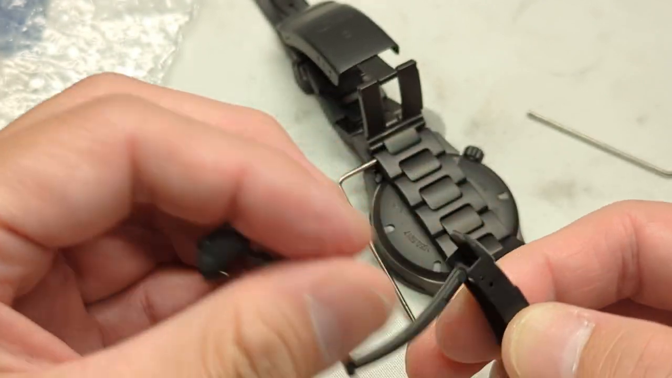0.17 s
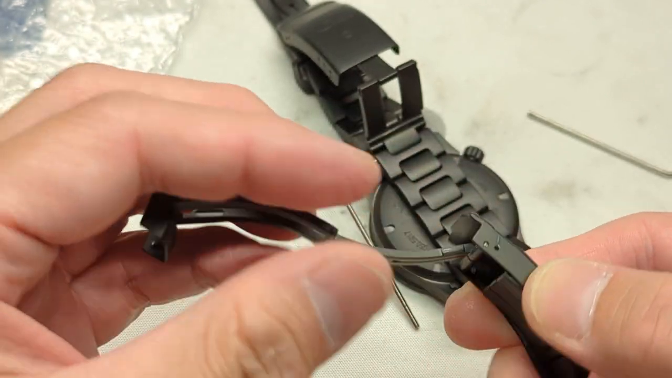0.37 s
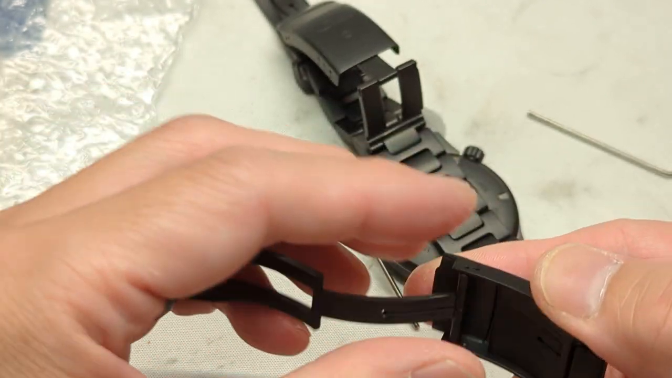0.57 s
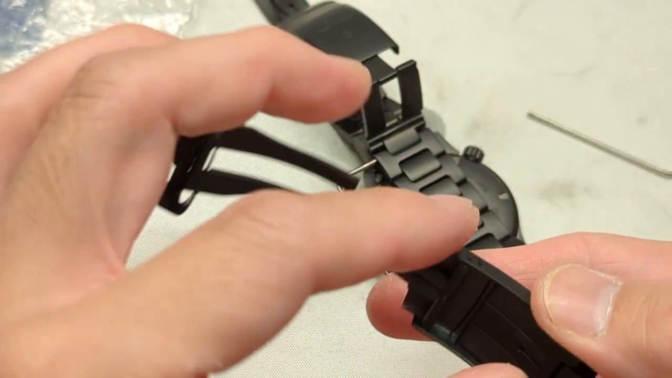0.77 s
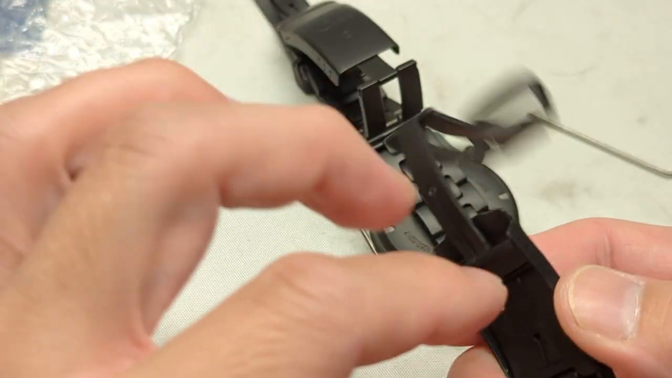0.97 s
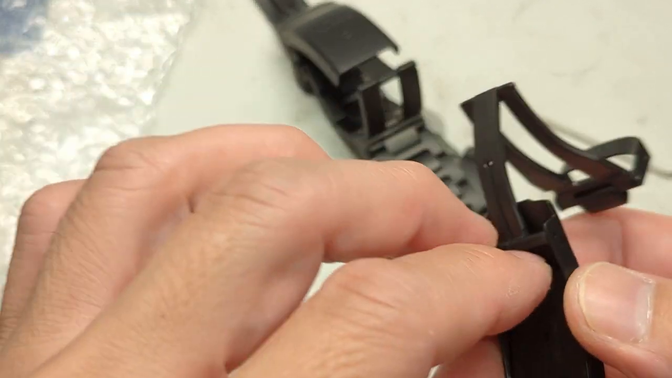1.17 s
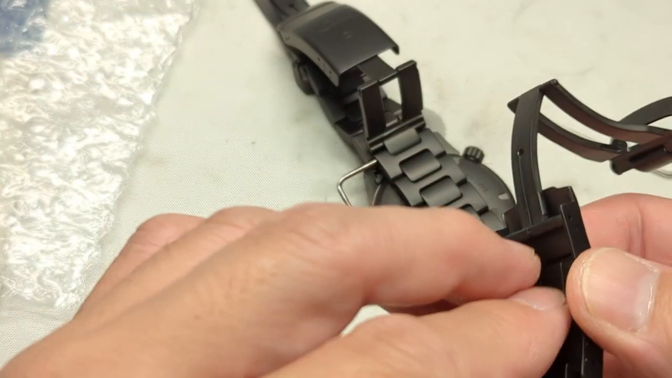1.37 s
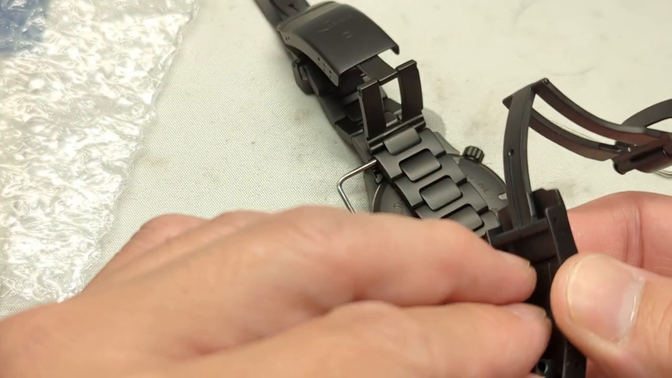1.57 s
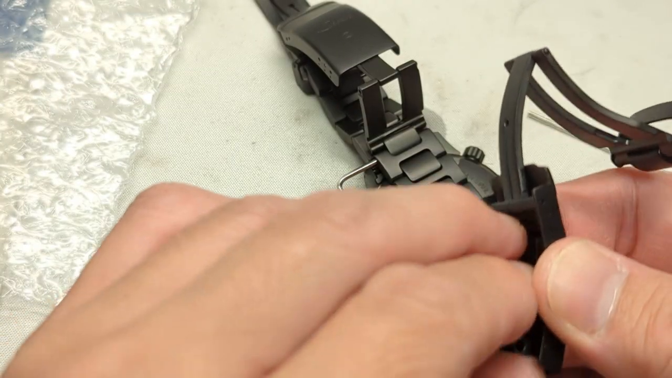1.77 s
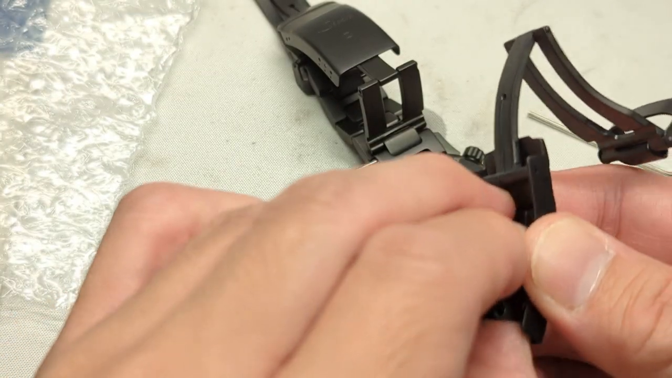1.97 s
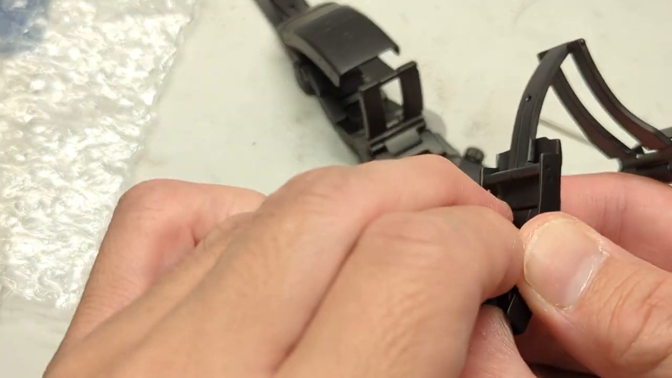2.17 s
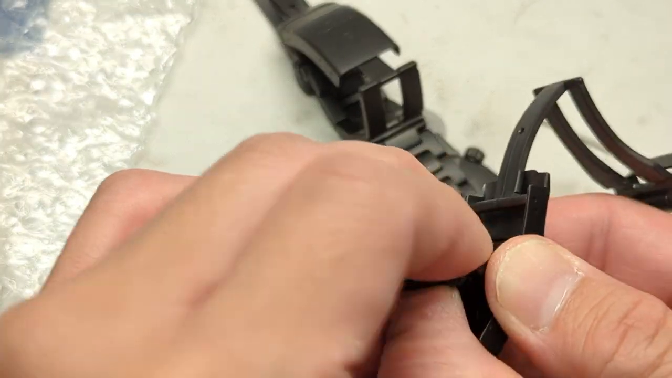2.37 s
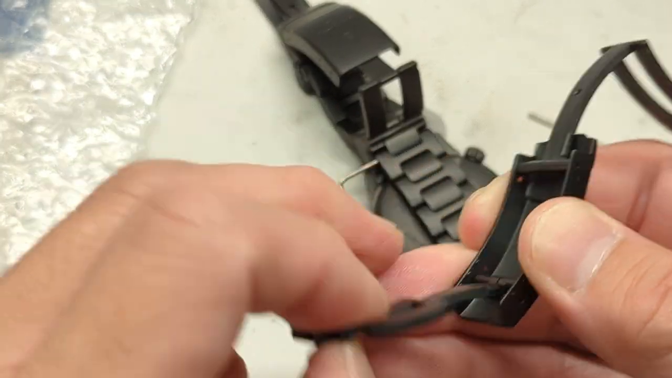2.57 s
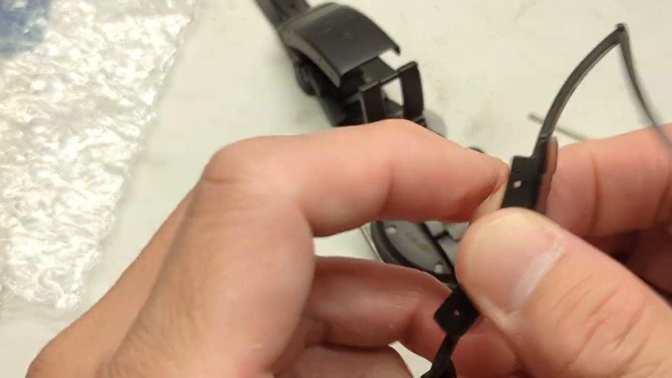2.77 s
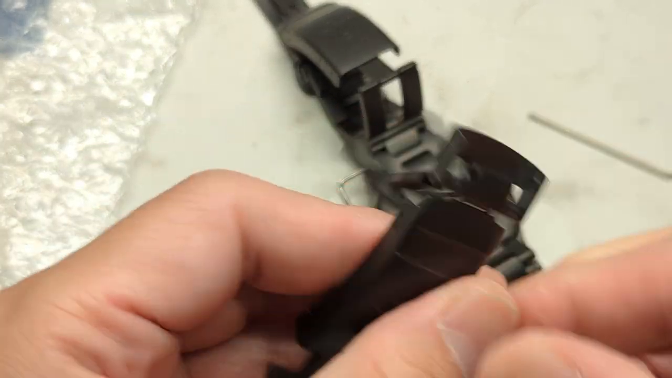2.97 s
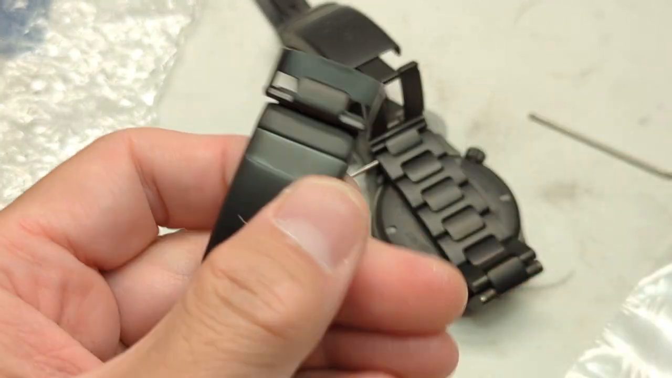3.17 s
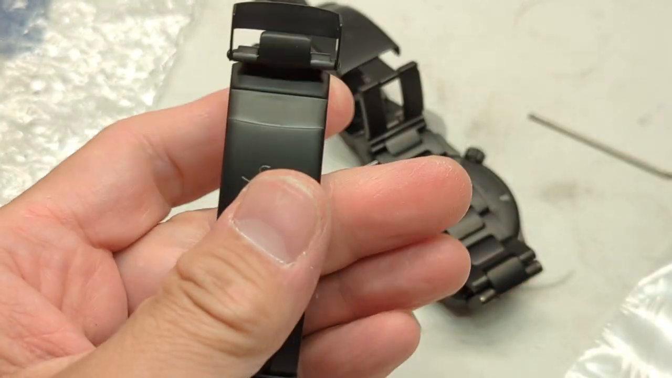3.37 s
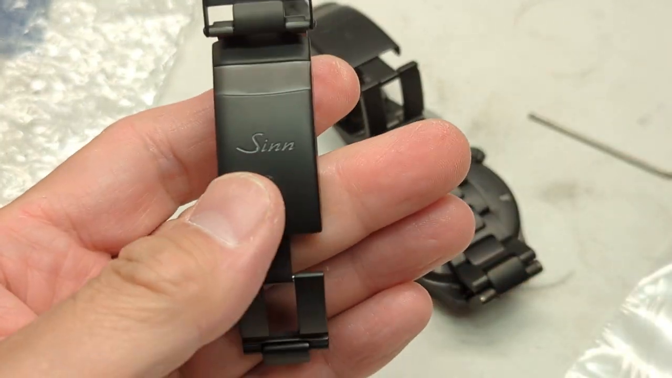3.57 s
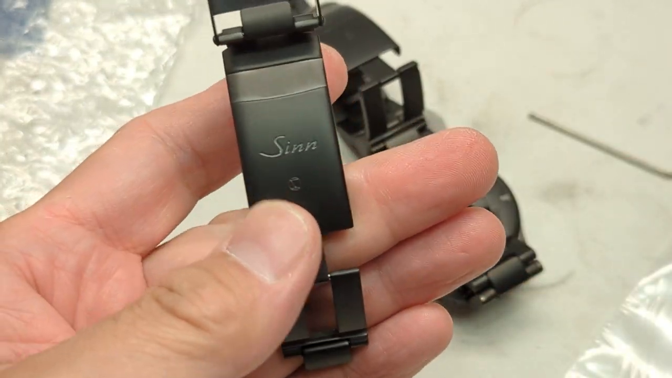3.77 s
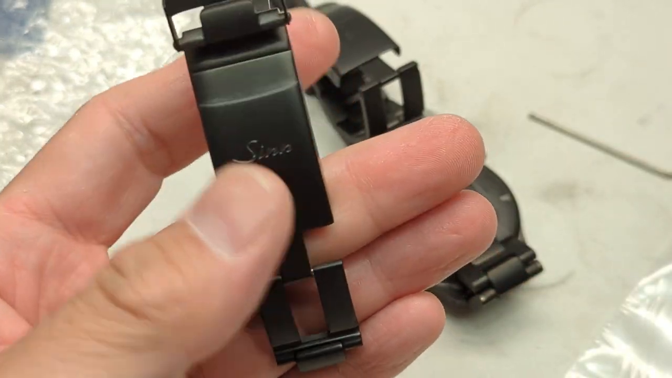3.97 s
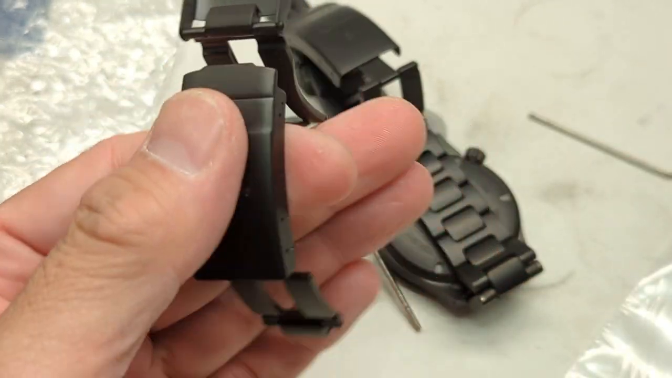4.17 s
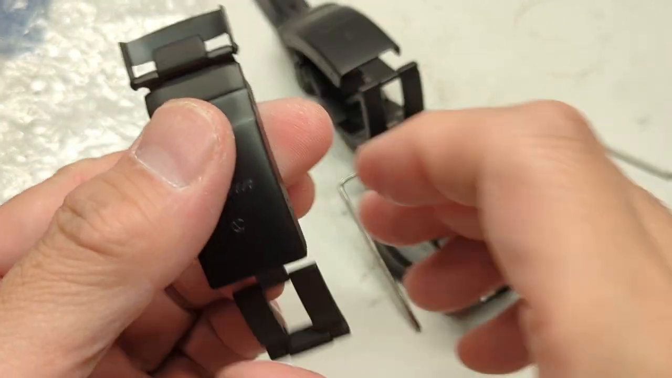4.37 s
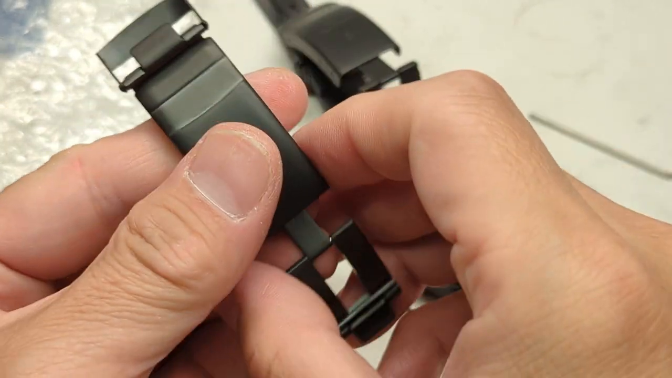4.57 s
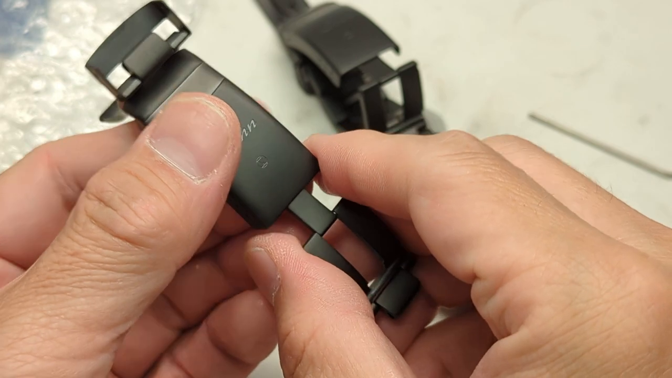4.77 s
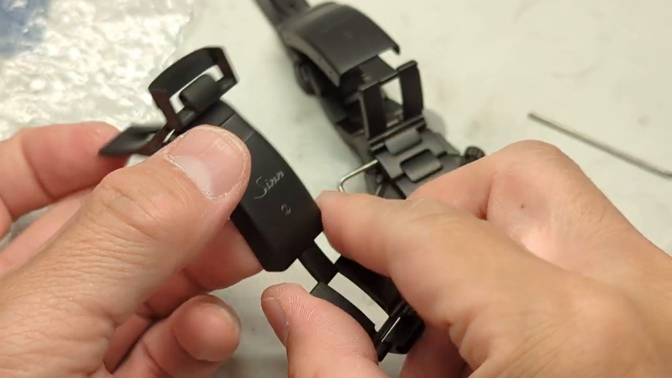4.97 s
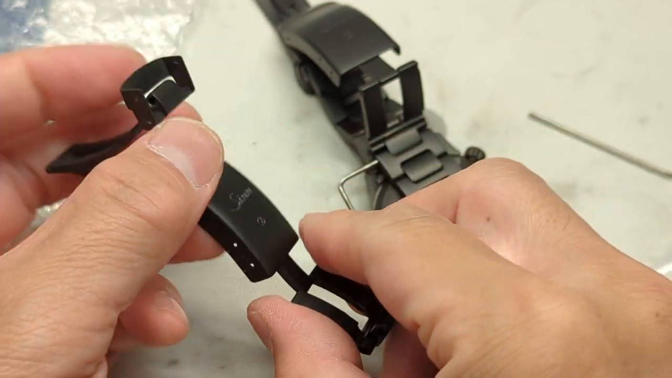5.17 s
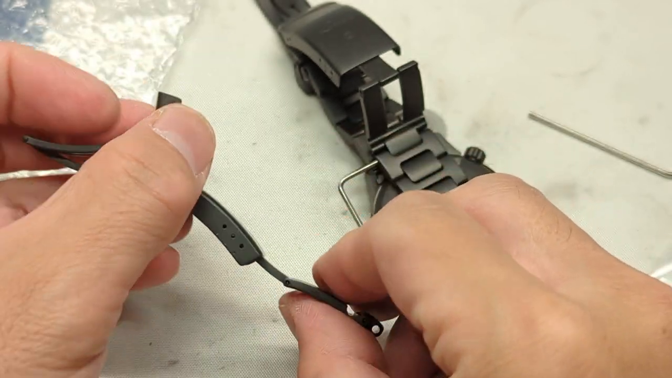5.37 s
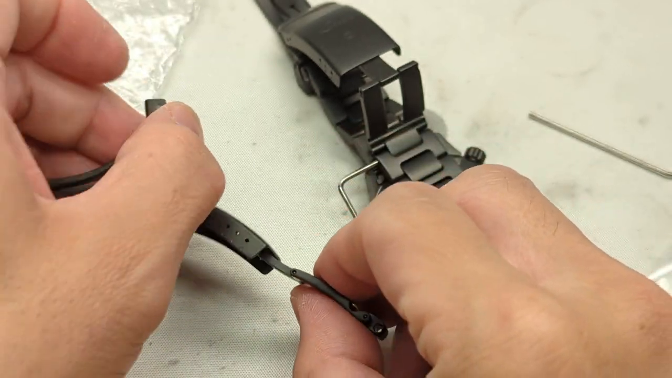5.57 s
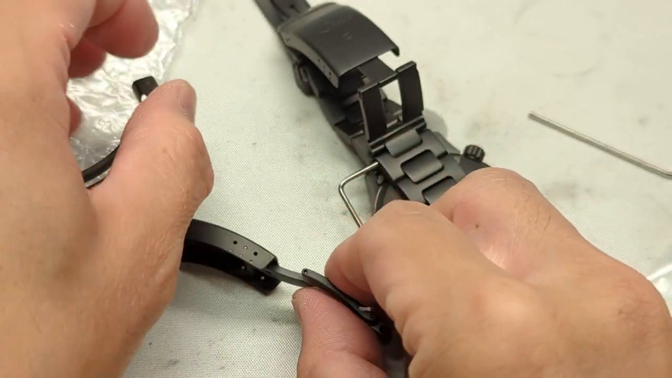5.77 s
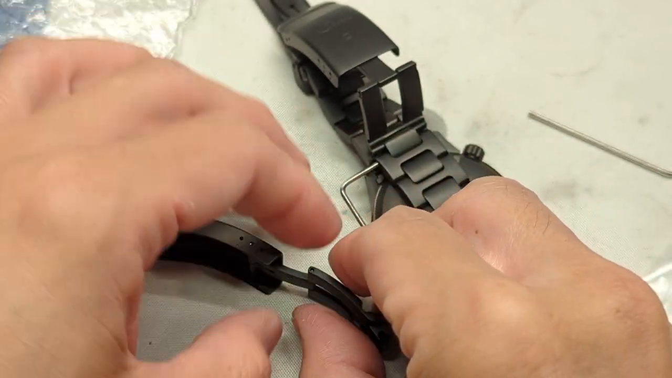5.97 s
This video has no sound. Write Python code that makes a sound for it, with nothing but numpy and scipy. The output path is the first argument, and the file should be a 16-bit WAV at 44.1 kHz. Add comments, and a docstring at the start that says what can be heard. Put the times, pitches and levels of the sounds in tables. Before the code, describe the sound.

Small steel clasp handled close up: dry ticks, bright clicks and faint scrapes, crowding into a rattling cluster midway, over low quiet hum.

```python
"""A low hum and rumble last throughout; over them one hand drags on a work bench, as filtered noise, and
squeaks faintly, as a gliding tone. Soon a steel watch clasp is turned over close to a stereo microphone:
skin and steel slide in strokes of stick-slip noise, between hand-damped ticks and knocks of noise bursts and
decaying modes, each over a soft, brief hiss. A small room rings briefly after each. The clicks crowd
together near the middle, where a few dull bumps of decaying noise join them, then thin out."""
import sys
import numpy as np
from scipy import signal
from scipy.fft import rfft, irfft, next_fast_len
from scipy.io import wavfile
from scipy.ndimage import uniform_filter1d

SR = 44100
rng = np.random.default_rng(int(sys.argv[2]) if len(sys.argv) > 2 else 0)


def dump(signal):
    """Clip the signal to [-1, 1] and save it as 16-bit WAV at the path in sys.argv[1]."""
    limited = np.clip(np.atleast_2d(signal).T, -1, 1)
    pcm = np.round(limited * 32767).astype(np.int16)
    wavfile.write(sys.argv[1], SR, pcm)


N = 265614  # samples, about six seconds

# Background noise density of the room: pitch_hz, relative_level_db
RUMBLE_SPECTRUM = [(25, -40), (36, -23), (46, -3), (70, -2), (95, -7), (130, -3.5), (180, -15.5),
                   (260, -20), (380, -25), (550, -30.5), (1000, -39), (1800, -46.5), (5000, -47),
                   (9000, -56.5)]
RUMBLE_DB, HUM_HZ, HUM_DB = -60.5, 50.6, -65  # rms levels; the hum wavers about its own
# The side of one hand drags over the bench as it shifts its grip: start_s, end_s, level_db
HAND_DRAGS = [(-0.15, 0.62, -65.5), (0.66, 1.5, -72.5)]
# Broad resonances of the bench under the hand: pitch_hz, relative_level_db
BENCH_SPECTRUM = [(150, -0.5), (230, 5), (380, 3.5), (520, -20.5), (700, -13.5), (870, -1.5), (1120, -16),
                  (1600, -4), (2350, -9.5), (3200, -10.5), (6000, -15), (15000, -25.5)]
SQUEAK_S, SQUEAK_HZ, SQUEAK_DB = .2, 2290, -58.5  # start, first mean pitch, mean peak level
# Spectrum of the room's tail: pitch_hz, relative_level_db
ROOM_SPECTRUM = [(500, 12), (2000, 0), (5000, -3), (9000, 4), (13000, 1.5), (16000, -6.5)]
# Strokes of skin and steel sliding, dullness being lows over top treble and prominence that of the
# blade's resonance: start_s, end_s, level_db (before a common trim), dullness_db, prominence_db
SLIDING_STROKES = [(0.09, 0.229, -59.5, 8, 1), (0.598, 0.64, -61, -14, -1), (0.774, 0.85, -58, -5.5, 0),
                   (0.979, 0.999, -61, 9.5, 3), (1.074, 1.105, -56.5, -5, 0), (1.441, 1.666, -74, 8, 0.5),
                   (1.773, 1.803, -71.5, -2, 9), (1.962, 2.006, -69, 7, 9), (2.185, 2.217, -67, 15, 10),
                   (2.306, 2.361, -48.5, -26, 13), (2.489, 2.575, -61, 6, 3), (2.744, 2.794, -55.5, 0.5, 0),
                   (3.147, 3.395, -64.5, 0.5, 3.5), (4.123, 4.153, -49.5, -7.5, 2),
                   (4.39, 4.585, -57.5, -4.5, 2), (4.677, 4.841, -69.5, 5, -1),
                   (5.079, 5.2, -53, -3.5, -1.5), (5.264, 5.442, -58.5, -4.5, -1),
                   (5.487, 5.579, -50.5, 1, -1), (5.593, 5.735, -50.5, -2.5, 4),
                   (5.795, 5.836, -54.5, 2, 3.5)]
# Force spectrum of a rub; small parts radiate little bass: pitch_hz, relative_level_db
RUB_SPECTRUM = [(400, -24), (1050, -2.5), (2300, 0.5), (4500, 6), (7400, -0.5), (10800, 0), (13800, 2),
                (14900, 0), (16000, -14.5)]
# Contacts of the clasp, pitch and prominence being those of the struck part:
# start_s, level_db, dullness_db, pitch_hz, prominence_db
CLASP_CONTACTS = [(0.144, -44, -13, 14100, 2), (0.1685, -40.5, -10, 13200, -1.5),
                  (0.3316, -50, 5, 8450, -1), (0.4732, -42, 0.5, 5600, 2), (0.6366, -32, -6.5, 9680, 4.5),
                  (0.814, -47.5, 10, 11400, 5), (0.854, -43.5, 3.5, 11000, 2.5),
                  (1.0448, -56, 20, 2580, -3), (1.0906, -36.5, -1, 13200, 1.5), (1.1665, -35, -1, 3510, 4),
                  (1.2733, -57, -9, 4270, 13), (1.3055, -41.5, 8, 3560, 1.5),
                  (1.4571, -55.5, 18, 6260, 8.5), (1.5248, -53.5, 20, 7960, 8),
                  (1.6578, -52.5, 5, 4980, 12), (2.0355, -57, -13, 5030, 9), (2.3097, -22.5, 4, 4720, 13.5),
                  (2.3315, -37, -2.5, 4870, 14), (2.3537, -41.5, -12.5, 4710, 4),
                  (2.5363, -40, 0, 6280, -4), (2.6186, -46, 11.5, 3680, 8), (2.755, -42, 16, 14900, 12.5),
                  (2.7684, -41, 7, 14300.0, 14), (2.7892, -46.5, 7, 3260, 10),
                  (2.8251, -51.5, 3, 14600, 10), (2.9041, -27, -19, 13000, 7),
                  (2.9328, -25.5, -15, 13700, 6), (2.9392, -24, 0, 12700, 12.5),
                  (2.9731, -23, -15, 13400, 5.5), (3.031, -22.5, -15.5, 4280, 7),
                  (3.044, -24, -1.5, 9940, 2.5), (3.072, -33, -9, 13600, -0.5),
                  (3.1054, -24, -16.5, 7720, 10.5), (3.1305, -39, 8.5, 4720, 13.5),
                  (3.2342, -35.5, -20, 6680, 14), (3.242, -30.5, -3, 4960, 13),
                  (3.376, -38.5, 11, 5650, 18), (3.3819, -37.5, 7, 5620, 16), (3.4779, -38, -9, 4970, 5.5),
                  (4.0253, -54.5, 18.5, 4280.0, 2.5), (4.1317, -44.5, -10, 5400, 12),
                  (4.146, -38.5, -22, 5400, 10), (4.213, -39.5, -18, 6600, 14),
                  (4.2365, -36.5, -21.5, 12050, -2), (4.2768, -46.5, -7, 13100, 12),
                  (4.377, -25.5, -29, 6520, 11.5), (4.4337, -37, -24, 7130, 20),
                  (4.5113, -26.5, -9.5, 5520, 9.5), (4.643, -52.5, -11, 4740, 14),
                  (4.7089, -52, -5, 5360, 15), (4.7491, -37, -3.5, 5560, 14.5),
                  (4.894, -45, -6.5, 12150, 9.5), (4.9747, -46, 2, 6070, 14.5),
                  (5.0452, -28, -34, 11550, -8.5), (5.1628, -45.5, 2, 3300.0, 2), (5.219, -37, 19, 3940, 4),
                  (5.301, -31, -5.5, 2510, -2.5), (5.6648, -37.5, -3, 7670, 4),
                  (5.684, -38.5, -3, 14300.0, 1), (5.705, -33, -7.5, 8800, -2.5),
                  (5.9283, -41, -10, 7600, 11.5)]
# Force spectrum of a blow; small parts radiate little bass: pitch_hz, relative_level_db
BLOW_SPECTRUM = [(400, -30), (1050, -20), (1650, -2.5), (2300, 0.5), (4500, 1), (7400, 0.5), (10800, 3.5),
                 (13800, -1), (14900, 3), (16000, -9.5)]
# Free ringing of the steel blades: pitch_hz, relative_level_db, t60_s
STEEL_MODES = [(2650, -9.5, .08), (4910, 1.5, .2), (5230, -1.5, .16), (6990, -22.5, .1), (8370, -11, .09),
               (11500, 7, 0.11), (11900, 2, .14), (14600, -7, 0.12), (13000, -15.5, .14), (14080, 11, .14),
               (14620, 3, 0.23)]
# Broad resonances of the clasp held in the hand: centre_hz, width_hz, gain_db (before its share is applied)
HELD_CLASP_RESONANCES = [(1640, 100, -18.5), (2576, 1200, 5.5), (2960, 420, -1), (4980, 690, 9),
                         (6590, 260, 7.5), (9400, 1100, -3.5), (11600, 1500, 2.5), (12940, 3600, 10.5)]
# Dull bumps of the hands and clasp: start_s, level_db, pitch_hz, decay_s
DULL_BUMPS = [(2.313, -53, 1010, 0.0041), (2.333, -48, 62, 0.017), (2.47, -70, 414, 0.017),
              (3.04, -79, 1050, 0.0064), (3.2, -55.5, 114, 0.031)]
PART_T60_S = .021  # ringing of the struck part
DULL_HZ, BRIGHT_HZ = 2460, 13800  # a softer contact tilts the spectrum between these
PART_OCTAVES = 0.28  # half-width, to 1/e of the lift in dB, of the band a contact favours
BLADE_HZ = 5000  # main resonance of the folding blade, which sings when it is rubbed
TOP_HZ = 15900  # upper edge of the recorder's band


def undb(db):
    """Amplitude ratio: twenty decibels are a factor of ten."""
    return 10 ** (np.asarray(db) / 20)


def unit(x):
    """Energy normalisation: scale to a mean energy of one per channel."""
    return x / np.sqrt(np.sum(x ** 2) / len(np.atleast_2d(x)))


def gain_at(hz, points):
    """Spectral interpolation: gain in straight dB lines on a log-frequency axis."""
    at, db = np.transpose(points)
    return undb(np.interp(np.log(np.maximum(hz, 1)), np.log(at), db))


def colour(x, points, body_share=0):
    """Linear filtering: impose a spectrum and, if wanted, a share of the held clasp's resonances."""
    size = next_fast_len(x.shape[-1], True)
    hz = np.fft.rfftfreq(size, 1 / SR)
    gain = gain_at(hz, points)
    if body_share:
        body_db = sum(db / (1 + (2 * (hz - centre) / width) ** 2)
                      for centre, width, db in HELD_CLASP_RESONANCES)
        gain = gain * undb(body_share * body_db)
    return irfft(rfft(x, size) * gain, size)[..., :x.shape[-1]]


def walk(rate, size=N):
    """Low-frequency fluctuation: smoothed random steps, rate per second, with a spread near one."""
    step = max(int(SR / rate), 2)
    held = np.repeat(rng.standard_normal(size // step + 1), step)
    return np.sqrt(3 / 2) * uniform_filter1d(held, step)[:size]


def pair(size, alike):
    """Partial coherence: two noises that share a fraction of their power."""
    noises = rng.standard_normal((3, size))
    alike = np.clip(alike, 0, 1)
    return np.sqrt(alike) * noises[2] + np.sqrt(1 - alike) * noises[:2]


def add(out, s, sound):
    """Superposition: mix a sound in at a time in seconds."""
    start = max(int(s * SR), 0)
    part = sound[:, :N - start]
    out[:, start:start + part.shape[1]] += part


def ports(x, lag_s=.000125, left_db=.5):
    """Stereo cues: a source off centre reaches one microphone a little earlier and louder."""
    left = x[0] * undb(left_db)
    right = np.roll(x[1], int(lag_s * SR)) * undb(-left_db)
    return np.array([left, right])


def grip(x, width_hz=260, depth_db=4.5):
    """Spectral ripple: random narrow peaks and dips, drawn anew for each sound."""
    size = next_fast_len(x.shape[-1], True)
    hz = np.fft.rfftfreq(size, 1 / SR)
    ripple = np.clip(rng.standard_normal(size=256), -2, 2)
    gain = undb(depth_db * np.interp(hz / width_hz, np.arange(len(ripple)), ripple))
    return irfft(rfft(x, size) * gain, size)[..., :x.shape[-1]]


def contact_spectrum(shape, dull_db, part_hz, lift_db):
    """Contact stiffness: softness tilts a force spectrum, which is lifted around the part touched."""
    hz = np.geomspace(400, 16000, 96)
    tilt = gain_at(hz, [(DULL_HZ, dull_db), (BRIGHT_HZ, 0)])
    db = 20 * np.log10(gain_at(hz, shape) * tilt)
    octaves_away = np.log2(hz / part_hz)
    return np.column_stack([hz, db + lift_db * np.exp(-(octaves_away / PART_OCTAVES) ** 2)])


def friction(size, rate=900, grain_db=2.5, flicker_db=2.6, smooth_share=1.0):
    """Granular noise: uneven bursts about a millisecond long, over smooth noise, come in fits and starts."""
    slip_s = .0008  # decay of the power of one burst
    happens = rng.random(size) < rate / SR
    slips = happens * undb(grain_db * np.minimum(rng.exponential(size=size), 4))
    slip_power = signal.lfilter([1], [1, -np.exp(-1 / (slip_s * SR))], slips ** 2)
    power = slip_power + abs(smooth_share)
    return pair(size, 0.21) * np.sqrt(power) * undb(flicker_db * walk(44, size))


def background(waver_db=2.5, hum_lag=.4):
    """Stationary noise and a tone: a rumble nearly alike in both channels, with a wavering hum."""
    mid = colour(rng.standard_normal(N), RUMBLE_SPECTRUM)
    side = colour(rng.standard_normal(N), RUMBLE_SPECTRUM)
    side = colour(side, [(40, -9.0), (150, -10.0), (350, -5.5), (650, -2.0)])
    rumble = np.sqrt(N) * unit(np.array([mid + side, mid - side])) * undb(RUMBLE_DB)
    phase = 2 * np.pi * HUM_HZ * np.arange(N) / SR + 0.5 * walk(2.4)
    hum = np.sqrt(2) * np.sin([phase, phase - hum_lag])  # lag in radians
    return rumble + hum * undb(HUM_DB + waver_db * walk(6))


def dragging(uneven_db=3.0, swell=0.66, lag_s=-.0001):
    """Sliding friction: skin drags over the bench in a soft, uneven swell, off to one side of the clasp."""
    out = squeak()
    for start, end, db in HAND_DRAGS:
        size = int((end - start) * SR)
        rub = colour(grip(pair(size, 0.8), width_hz=90, depth_db=2.5), BENCH_SPECTRUM)
        pressure = np.sin(np.pi * np.arange(size) / size) ** swell
        pressure = pressure * undb(uneven_db * walk(12.86, size))
        drag = undb(db) * np.sqrt(size) * unit(rub * pressure)
        already_past = max(int(-start * SR), 0)  # a drag may be under way at time zero
        add(out, start, drag[:, already_past:])
    return ports(out, lag_s, left_db=-1)


def room(x, wet_db=-14, t60_low=0.35, t60_high=0.28, early_db=-12, early_s=0.0011, gap_s=0.0048):
    """Reverberation: quick scatter from bench and hands, then a small room's tail, shorter in the treble."""
    t = np.arange(SR // 3) / SR
    begun = t > gap_s
    low_pass = signal.butter(2, 6000, fs=SR, output="sos")
    high_pass = signal.butter(2, 6000, "high", fs=SR, output="sos")
    low = signal.sosfilt(low_pass, rng.standard_normal((2, len(t))))
    high = signal.sosfilt(high_pass, rng.standard_normal((2, len(t))))
    decaying = low * 1000 ** (-t / t60_low) + high * 1000 ** (-t / t60_high)
    tail = unit(colour(begun * decaying, ROOM_SPECTRUM))
    early = unit(pair(len(t), .3) * begun * np.exp(-t / early_s))
    response = undb(wet_db) * tail + undb(early_db) * early
    return signal.oaconvolve(x, response, axes=1)[:, :N]


def sliding(slide_db=-1, fade_s=.026, swell=0.75, catch_rate=500, catch_db=3.5, judder_db=2.4, shift_rate=25):
    """Stick-slip at two contacts: fingertips rub and blades scrape and catch in strokes that swell and die."""
    out = np.zeros((2, N))
    for start, end, db, dull_db, lift_db in SLIDING_STROKES:
        size = int((max(end - start, 0) + fade_s) * SR)
        # two points of contact, each with its own colour, take turns to carry the load
        first, second = (
            grip(friction(SR // 2, rate=catch_rate, grain_db=catch_db, flicker_db=judder_db), depth_db=4.5)
            for _ in range(2))
        load = walk(shift_rate, SR // 2) + np.pi / 4
        slips = np.cos(load) * first + np.sin(load) * second
        spectrum = contact_spectrum(RUB_SPECTRUM, dull_db, BLADE_HZ, lift_db)
        stroke = colour(slips, spectrum, body_share=0.29)[:, :size]
        pressure = np.sin(np.pi * np.arange(size) / size) ** swell
        add(out, start - fade_s / 3, undb(db + slide_db) * np.sqrt(size) * unit(stroke * pressure))
    return out


def clasp(part_db=-9, ring_share=.6, steel_db=-16, hiss_db=-13.5, lead_s=.013, click_s=0.0048,
          mode_scatter_db=3, spread=1.1):
    """Impact excitation: each contact cracks, rings the struck part and wakes the blades' modes, over a hiss."""
    out, t = np.zeros((2, N)), np.arange(8192) / SR
    steel_hz, mode_db, t60 = np.transpose(STEEL_MODES)
    count = len(STEEL_MODES)
    modes = np.exp((2j * np.pi * steel_hz - np.log(1000) / t60)[:, None] * t)
    for s, db, dull_db, part_hz, lift_db in CLASP_CONTACTS:
        spectrum = contact_spectrum(BLOW_SPECTRUM, dull_db, part_hz, lift_db)
        strength = undb(db) * np.sqrt(click_s * SR)
        steel_gain = gain_at(steel_hz, spectrum)
        # every blow lands elsewhere, so it shares its force among the modes anew
        force = undb(mode_db + mode_scatter_db * rng.standard_normal(count)) * steel_gain
        phase = rng.uniform(0, 2 * np.pi, count) + spread * rng.standard_normal((2, count))
        steel = np.einsum("cm,mt->ct", force * np.exp(1j * phase), modes).imag
        # the struck part rings as strongly as the blow feeds its pitch
        fed = (gain_at(part_hz, spectrum) / np.sqrt(np.mean(steel_gain ** 2))) ** ring_share
        struck_part = undb(part_db) * fed * ring(t, part_hz, PART_T60_S)
        click = crack(t, spectrum) + struck_part + undb(steel_db) * unit(steel)
        add(out, s, strength * unit(click))
        add(out, s - lead_s, strength * undb(hiss_db) * click_hiss(dull_db, part_hz, lift_db, lead_s))
    return out


def click_hiss(dull_db, part_hz, lift_db, lead_s, fade_s=.018, follow=0.39, lift_share=0.37):
    """Enveloped noise: a soft hiss swells briefly under each click and dies away after it."""
    t = np.arange(SR // 5) / SR
    envelope = np.minimum(t / lead_s, 1) * np.exp(-np.maximum(t - lead_s, 0) / fade_s)
    spectrum = contact_spectrum(RUB_SPECTRUM, follow * dull_db, part_hz, lift_share * lift_db)
    return unit(colour(grip(friction(len(t))), spectrum, body_share=0.54) * envelope)


def crack(t, spectrum, slow_db=-14, alike=0.48):
    """High modal density: the hand-damped links give a sharp noise burst and a short after-ring."""
    rise_s, fast_s, slow_s = .0005, .0016, .008
    lead = 64  # samples of room ahead of the burst while it is filtered
    decay = np.exp(-t / fast_s) + undb(slow_db) * np.exp(-t / slow_s)
    burst = pair(len(t), alike) * (1 - np.exp(-t / rise_s)) * decay
    # the contact lies anywhere along the clasp, so its lag between the microphones varies
    bins = rfft([np.roll(burst[0], lead), np.roll(burst[1], lead + rng.integers(-1, 3))])
    # the blow feeds all bands alike; only the narrow peaks and dips differ from click to click
    bins = bins / np.sqrt(uniform_filter1d(np.mean(abs(bins) ** 2, axis=0), size=520))
    shaped = colour(irfft(bins), spectrum, body_share=0.94)[:, lead:]
    return unit(np.pad(shaped, ((0, 0), (0, lead))))


def ring(t, hz, t60, spread=1.0, split=0.025):
    """Mode splitting: a close pair of damped modes, with its own phase at each microphone."""
    tones = 0
    for side in (-1, 1):
        phase = rng.uniform(0, 2 * np.pi) + spread * rng.standard_normal((2, 1))
        tones = tones + np.sin(2 * np.pi * hz * (1 + side * split) * t + phase)
    return unit(tones * np.exp(-np.log(1000) * t / t60))


def squeak(rise_s=0.019, fade_s=0.096, sag_hz_per_s=250, waver_hz=70, skip_db=2.5):
    """Rapid stick-slip: gripping skin gives a faint, unsteady tone that sinks as the hand slows."""
    t = np.arange(SR // 3) / SR
    hz = SQUEAK_HZ - sag_hz_per_s * t + waver_hz * walk(300, len(t))
    level = undb(SQUEAK_DB + skip_db * walk(120, len(t)))
    tone = np.sin(2 * np.pi * np.cumsum(hz) / SR) * level
    envelope = np.minimum(t / rise_s, 1) * np.exp(-np.maximum(t - rise_s, 0) / fade_s)
    out = np.zeros((2, N))
    add(out, SQUEAK_S, np.array([tone, tone]) * envelope)
    return out


def bumps(rise_s=.004):
    """Heavily damped impact: soft, dull knocks as the hands take up the clasp's movement."""
    out, t = np.zeros((2, N)), np.arange(SR // 3) / SR
    for s, db, hz, decay_s in DULL_BUMPS:
        band = [(hz / 3, -30), (hz / 1.7, -2), (hz, 0), (hz * 2.0, -4), (hz * 4, -32)]
        body = colour(pair(len(t), 0.93), band)
        envelope = np.exp(-t / decay_s) * (1 - np.exp(-t / rise_s))
        add(out, s, undb(db) * np.sqrt(decay_s * SR) * unit(body * envelope))
    return out


def scene():
    """Superposition: hand and clasp, the room's answer to them, the bumps and the background."""
    near = ports(clasp() + sliding()) + dragging()
    return near + room(near) + bumps() + background()


def record(dry):
    """Band limitation: the recorder cuts the top with a steep low-pass."""
    return signal.sosfilt(signal.ellip(8, .2, 70, TOP_HZ, fs=SR, output="sos"), dry)


dry = scene()
out = record(dry)
dump(out)
```